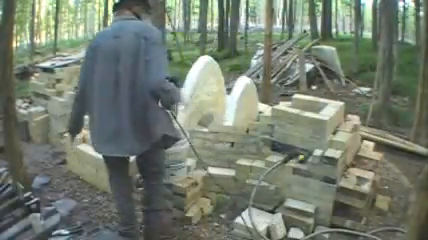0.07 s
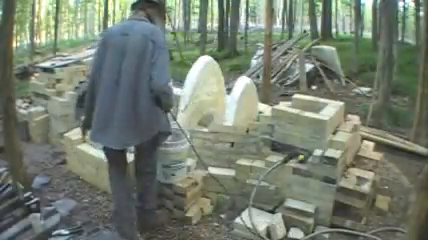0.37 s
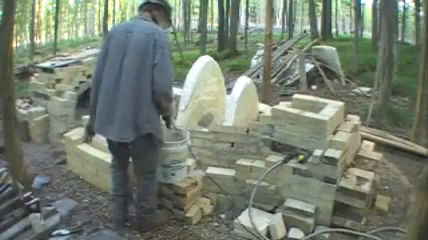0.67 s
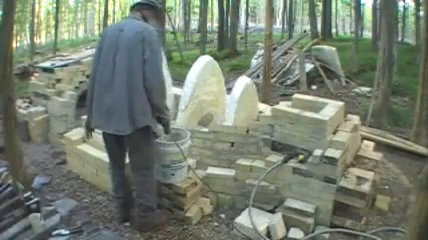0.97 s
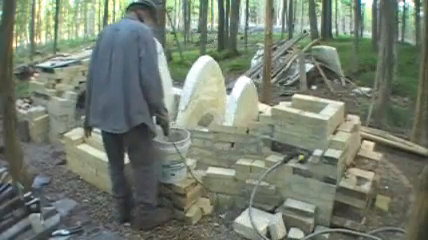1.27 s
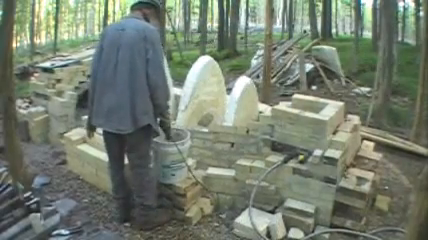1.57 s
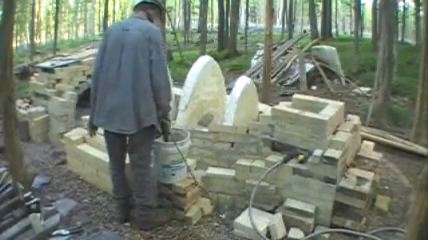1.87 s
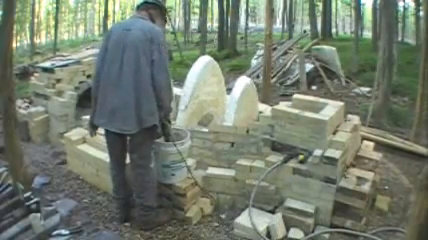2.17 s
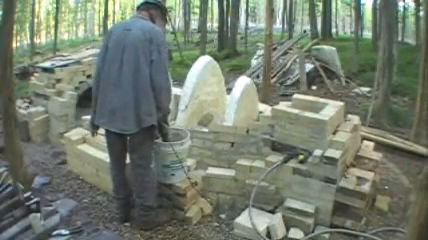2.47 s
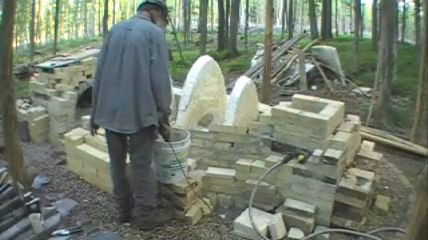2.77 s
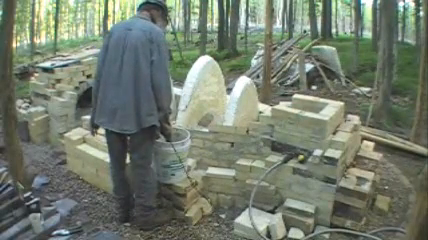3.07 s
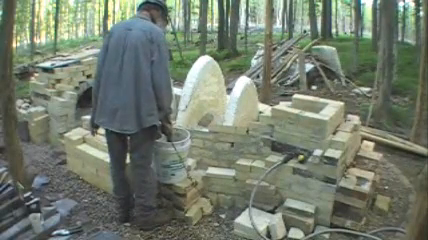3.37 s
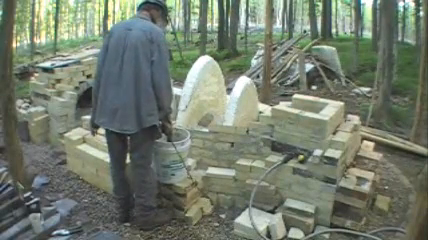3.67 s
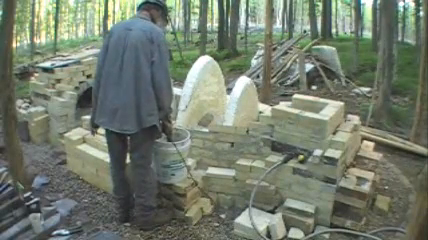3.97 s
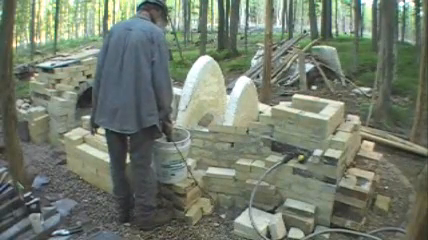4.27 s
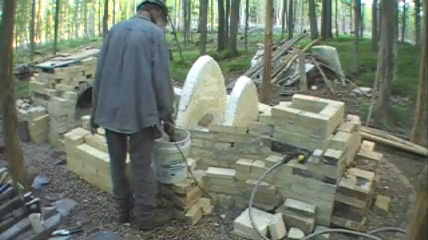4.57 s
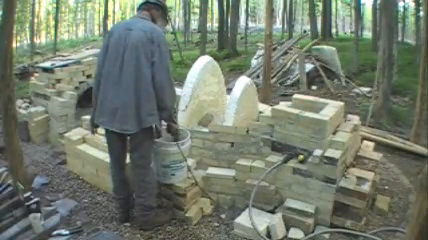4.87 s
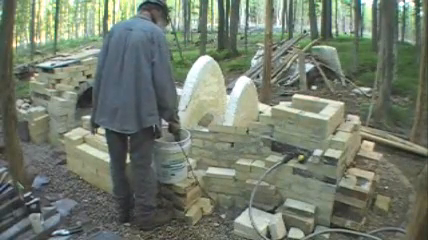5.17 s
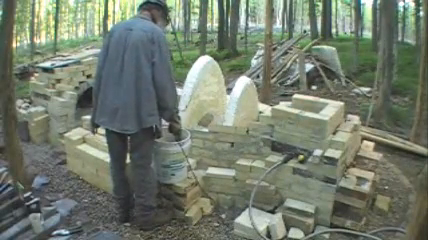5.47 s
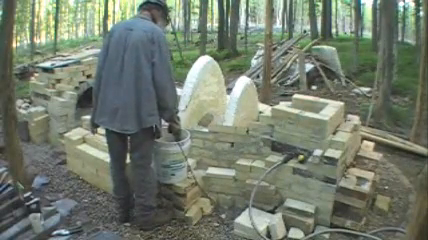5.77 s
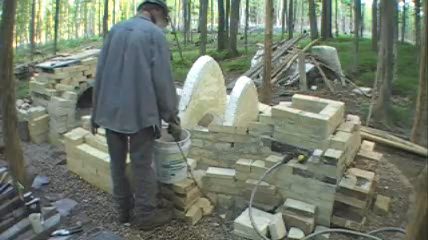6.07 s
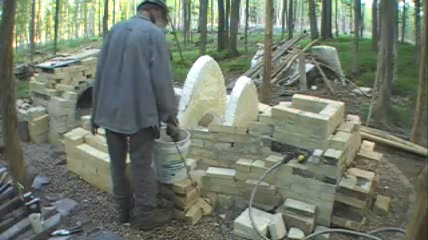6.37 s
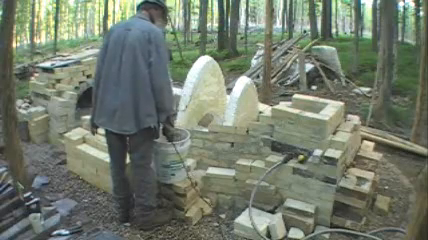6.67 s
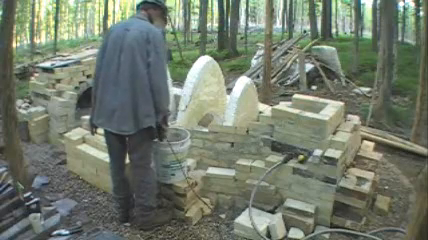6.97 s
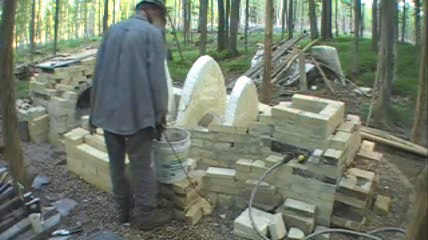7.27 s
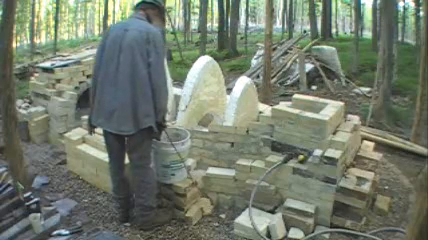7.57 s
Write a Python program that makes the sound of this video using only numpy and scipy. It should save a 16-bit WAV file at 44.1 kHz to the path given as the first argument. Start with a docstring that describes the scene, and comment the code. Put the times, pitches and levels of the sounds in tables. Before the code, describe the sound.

Over a faint woodland hush, two steps scuff on gravel at about 0.3 and 0.9 seconds. From 0.8 to 1.4 seconds a mixing paddle settles into wet mortar with soft, dull plops. At 1.5 seconds a corded electric drill starts with a short, grating squeal and rises to full speed within about half a second. It is much louder than the steps and runs without stopping to the end: a high gear whine with a fast throb, wavering slightly over hissing motor air and chattering gear teeth. The paddle knocks once against the plastic bucket at 2.3 seconds, then in short, hollow clusters around 5 to 5.5 and 6.3 seconds, and more often from 7 seconds until the end at about 7.7. Everything sits straight ahead of the microphone, outdoors, with only very faint echoes.

```python
"""In the hush of a quiet wood, two steps scuff on gravel and a paddle settles in a bucket of wet mortar.
At 1.5 s a corded drill starts with a squeal of strained gears, spins up and stirs the mortar.
Its rotor (the motor's spinning part) drives a fan and two gears: the gear whine throbs once per
paddle turn, over the rush of air and sparking brushes and the chatter of loose teeth.
Now and then, and more often near the end, the paddle knocks against the plastic bucket."""
import sys
import numpy as np
from scipy import signal
from scipy.fft import rfft, irfft, next_fast_len
from scipy.io import wavfile

SR = 44100
rng = np.random.default_rng(int(sys.argv[2]) if len(sys.argv) > 2 else 0)


def to_wav(sig):
    """Store sig (one row per channel, or 1-D mono) as 16-bit WAV at the path in sys.argv[1].

    Samples outside -1..1 are clipped; the rate is SR.
    """
    pcm = np.clip(np.atleast_2d(sig), -1, 1) * 32767
    pcm = np.round(pcm).astype(np.int16)
    wavfile.write(sys.argv[1], SR, pcm.T)  # frames by channels


N = 340452
TIME = np.arange(N) / SR

# tone colour of the outdoor hush: (frequency [Hz], level [dB])
HUSH_COLOUR = [(25, -32), (55, -26), (100, -12), (170, -7.5), (400, -0.5), (750, -1), (1050, 0.5),
               (1600, -1.5), (2150, -2), (2700, -1.5), (4000, -2.5), (7700, -4.5), (10000, -18),
               (13000, -24), (15000, -31)]
# boots pressing into gravel: (time [s], level [dB], fade time [s])
BOOT_SCUFFS = [(.276, -36.5, 0.02), (.290, -34.5, 0.059), (.328, -36, 0.018), (.365, -56, 0.17),
               (.52, -47, .025), (.672, -47, .018), (.907, -36, 0.014), (.913, -30.5, 0.013),
               (.929, -40, 0.016), (.96, -44.5, 0.031)]
# single bits of grit snapping: (time [s], level [dB])
GRIT_TICKS = [(.278, -37), (.290, -31), (.297, -24.5), (.314, -28), (0.394, -34), (.408, -33.5),
              (.671, -38), (0.776, -36.5), (0.915, -26), (1.025, -41), (1.38, -41)]
# tone colour of the gravel: (frequency [Hz], level [dB])
GRAVEL_COLOUR = [(50, -38), (150, -13), (400, -1.5), (1100, -6), (2000, -8), (3800, -5.5), (5000, -6),
                 (7400, 5.5), (8600, -4), (10000, -13), (15000, -23)]
# stones clinking together: (frequency [Hz], width [Hz], boost [dB])
STONE_RESONANCES = [(233, 110, 7.5), (4970, 390, 6)]
# the paddle settling in the mortar: (time [s], level [dB], fade time [s])
MORTAR_PLOPS = [(.806, -52, .008), (.93, -41.5, 0.03), (1.008, -45, 0.0034), (1.068, -46, 0.0051),
                (1.139, -44, 0.0045), (1.179, -44.5, .003), (1.215, -51, .018), (1.295, -46, 0.0037),
                (1.35, -43, 0.0068), (1.387, -46, 0.005)]
# tone colour of wet mortar: (frequency [Hz], level [dB])
MORTAR_COLOUR = [(80, -27), (250, -5), (450, -1), (1000, -0.5), (1500, -10), (3000, -17), (8000, -16),
                 (14000, -47)]
# two surges of starting current: (time [s], length [s], share of full current [0-1])
CURRENT_SURGES = [(1.512, 0.055, 0.77), (1.586, 0.094, 0.97)]
# drag from the gears at first, then from the mortar: (time [s], rotor speed lost [turns/s])
ROTOR_DRAG = [(1.655, 0), (1.695, 13), (1.8, 1), (1.98, 0), (2.17, 2.5), (2.4, -2.16), (2.6, -1.21),
              (3.0, 1.9), (4.2, 4.5), (4.44, 3), (4.62, 1.25), (4.94, 0.35), (5.16, 3), (5.68, 4),
              (6.15, 1.3), (6.62, 3), (6.95, 1.8), (7.13, 0), (7.35, 0.6), (7.72, 2.2)]
# tones of the meeting teeth; a tone's "order" is its number of cycles per rotor turn: (order, level [dB],
# phase swing [rad], throb depth [factor], share of the bite [factor], share of the squeal [factor])
GEAR_TONES = [(4, -32, 1.48, 0.39, 0, 0.59), (8, -32.5, 1.4, 0.79, 0.92, 0.87),
              (12, -31.5, 1.2, 0.25, 0.037, 1.12), (16, -36, 0.86, 0.28, 0.27, 0.34),
              (20, -44, 0.99, 0.27, 0, 1.1), (24, -41, .3, 0.24, 0, 1.9), (28, -51.5, 2, 0.35, 0.24, 0.46),
              (32, -55.5, 0.63, 0.37, 0, 1.9)]
# the lowest gear tone swells as the drill is moved, and the throb changes shape:
# (time [s], level change [dB], lead of the teeth's shift over their pressure [rad])
GEAR_WHINE = [(1.68, 4, 0), (1.74, -3, 0), (1.79, 6.5, -0.024), (2.1, 8.5, 0.54), (2.45, 4.5, 1.4),
              (3.1, 1.5, 1.6), (3.9, 3.5, 1.2), (4.55, 8, 0.14), (4.97, -2, -0.24), (5.1, 5, -0.6),
              (5.9, 1.5, 0.23), (6.35, 7.5, 0), (6.55, 5, -0.54), (6.75, 10, 0), (6.93, 4.5, -0.29),
              (7.04, 8.5, 0.18), (7.19, -3, .8), (7.35, 5, 1.2), (7.65, 9, 0.33)]
# how hard the teeth bite, lifting some higher gear tones: (time [s], boost [dB])
TOOTH_BITE = [(2.08, 0), (2.33, 7), (2.62, 3.5), (3.15, 1), (3.45, 7), (3.8, 3), (4.1, 5.5), (4.7, 3.5),
              (5.5, 0), (6.1, 3.5), (6.35, 5.5), (6.9, 2), (7.65, 6.5)]
# a gear tone swells or sinks as the drill is turned: (time [s], half length [s], order, change [dB])
GEAR_SWELLS = [(6.38, .14, 8, 2.5), (1.77, .06, 12, 4), (1.98, .1, 12, 5.5), (1.85, .1, 20, 5),
               (1.8, .08, 16, 5), (2.32, 0.11, 12, 7), (3.55, 0.4, 12, 6.5), (4.42, .2, 12, -4),
               (5.55, .4, 12, 4.5), (6.82, .2, 12, 3), (7.28, 0.08, 12, 7.5), (1.95, .14, 16, 5),
               (5.55, .4, 16, 3), (7.2, .7, 16, -4), (1.58, .02, 24, 14), (1.82, .07, 24, 5),
               (2.08, 0.2, 24, 6), (4.3, 0.18, 24, 8), (2.05, .2, 32, 10), (2.6, .25, 32, 5),
               (3.87, .13, 32, 8), (5.92, .22, 32, 9), (6.6, .25, 32, 5)]
# gearbox ringing under the strain of starting: (frequency [Hz], width [Hz], boost [dB])
SQUEAL_RESONANCES = [(868, 62, 25), (1710, 90, 19.5), (2920, 1200, 22.5)]
# tone colour of grating teeth: (frequency [Hz], level [dB])
GRATING_COLOUR = [(300, -25), (800, -2), (2000, -13), (3000, 2), (4500, -6), (9000, -26)]
# tone colour of the fan air and brushes: (frequency [Hz], level [dB])
AIR_COLOUR = [(25, -39), (100, -33), (190, -27.5), (270, -19), (400, -9), (690, -6.5), (1000, -3),
              (2250, -3), (3500, -0.5), (5500, 0.5), (7700, 0.5), (8900, -9.5), (10500, -14.5),
              (12400, -29), (15000, -39)]
# treble of that rush: (time [s], level change [dB])
AIR_TREBLE = [(2.3, 0.35), (5.9, -0.5), (6.9, -1.5), (7.72, -3)]
# the drill's housing and vents: (frequency [Hz], width [Hz], boost [dB])
HOUSING_RESONANCES = [(319, 45, 9), (810, 99, 8), (1090, 52, 4.5), (1560, 390, 3.5), (1910, 280, 5),
                      (2200, 110, -6), (2440, 270, 0), (3010, 1200, 5), (4280, 63, 3.5), (4640, 890, 5.5)]
# tones of the fan and the rotor's sliding contacts: (order, level [dB])
FAN_TONES = [(2, -52), (3, -49), (7, -47), (14, -41), (15, -44), (18, -43.5), (19, -43.5), (21, -44),
             (22, -44.5), (23, -47), (25, -64), (29, -61)]
# two tones that surge as the drill is turned: (time [s], order 11 level [dB], order 13 level [dB])
SURGING_TONES = [(1.75, -31, -43), (2.0, -27.5, -41), (2.25, -28, -24), (2.6, -31, -42),
                 (3.2, -31.5, -28.5), (3.5, -35, -30), (3.95, -31.5, -35), (4.35, -28.5, -28),
                 (4.62, -32.5, -39), (4.85, -28.5, -21.5), (5.15, -27, -38), (5.45, -31, -47),
                 (5.9, -25, -33), (6.22, -34.5, -33), (6.6, -24.5, -30), (6.85, -35.5, -35),
                 (7.1, -35, -23.5), (7.25, -26.5, -33), (7.45, -45, -30)]
# hum of the unbalanced rotor: (time [s], level [dB])
UNBALANCE_HUM = [(1.65, -58), (1.85, -47.5), (2.12, -41), (2.5, -44), (3.2, -42.5), (3.6, -44.5),
                 (4.1, -53), (4.8, -42.5), (7.72, -43.5)]
# loose gear teeth chattering: (time [s], level [dB])
CHATTER_LEVEL = [(1.95, -31), (2.3, -28.5), (2.7, -33.5), (3.7, -33), (4.05, -28), (4.4, -32), (4.6, -29),
                 (5.0, -33.5), (5.7, -32), (6.5, -32.5), (7.72, -39)]
# tone colour of the chatter: (frequency [Hz], level [dB])
CHATTER_COLOUR = [(200, -29.5), (600, -37), (850, 1.5), (1300, -9.5), (1900, -2), (2250, -11), (6000, -36)]
# the gearbox shell: (frequency [Hz], width [Hz], boost [dB])
SHELL_RESONANCES = [(860, 350, 6.5), (1838, 120, 17), (3045, 110, 30), (4500, 600, 16)]
# the paddle hitting the bucket: (time [s], level [dB], contact length [s], extra low thud [dB])
PADDLE_KNOCKS = [(2.305, -27, 0.015, 2), (5.042, -20, 0.007, 1), (5.127, -20.5, 0.01, -1),
                 (5.187, -22.5, 0.01, -1), (5.240, -19, .007, 0), (5.469, -20, 0.01, -1),
                 (6.238, -21, 0.0075, -3), (6.290, -23, .014, 2), (6.346, -21.5, 0.012, 3),
                 (6.708, -26, .007, -6), (7.120, -24.5, .007, -4), (7.140, -21.5, 0.012, -3),
                 (7.192, -25.5, .01, -2), (7.208, -24, 0.012, -1), (7.310, -22, 0.013, 4),
                 (7.384, -24, 0.014, 0), (7.450, -26, .008, 0), (7.505, -17.5, 0.004, -7),
                 (7.568, -13, 0.0055, -8)]
# ringing notes of the bucket wall: (frequency [Hz], time to fade by 60 dB [s], level [dB])
BUCKET_NOTES = [(376, 0.047, -3), (550, 0.021, 0.5), (785, 0.029, 7), (918, 0.042, 3.5), (1093, 0.03, 3),
                (1260, 0.011, 8), (1800, 0.013, 8)]
# stereo width: (frequency [Hz], level of the left-right difference [dB])
STEREO_WIDTH = [(60, -31), (150, -3), (300, -20), (900, -29), (1480, -11.5), (1900, -53), (3300, -25),
                (4300, -17.5), (7600, -20), (9200, 4), (10600, -15)]

SMALL_GEAR_TEETH, BIG_GEAR_TEETH = 4, 41
GEAR_RATIO = SMALL_GEAR_TEETH / BIG_GEAR_TEETH   # paddle turns per rotor turn
TRIGGER_S, FREE_TURNS_PER_S, MAINS_HZ = 1.5, 366.5, 60


def from_db(db):
    """Turn decibels into a factor to multiply by."""
    return 10 ** (np.asarray(db) / 20)


def rms_one(x):
    """Scale a signal to an average power of 1."""
    return x / np.sqrt(np.mean(x ** 2) + 1e-20)


def in_time(rows):
    """Join a table's points with straight lines: one curve for each column after the time."""
    times, *columns = np.transpose(rows)
    return [np.interp(TIME, times, column) for column in columns]


def drift(rate_hz):
    """A smooth random wobble of typical size 1; a higher rate wobbles faster."""
    pole = np.exp(-40 * np.pi * rate_hz / SR)
    noise = rng.standard_normal(N // 20 + 4002)   # one value per 20 samples
    slow = signal.lfilter([1], [1, -2 * pole, pole * pole], noise)[4000:]
    return np.interp(np.arange(N) / 20, np.arange(len(slow)), rms_one(slow))


def boost_db(hz, resonances):
    """The boost at a frequency: each resonance adds a bell-shaped bump."""
    return sum(db / (1 + (2 * (hz - centre) / width) ** 2) for centre, width, db in resonances)


def colour(x, spectrum, resonances=(), keep_power=True):
    """Filter a sound by a smooth tone colour with resonances on top."""
    size = next_fast_len(N + SR // 10)
    hz = np.maximum(np.fft.rfftfreq(size, 1 / SR), 1)
    points_hz, points_db = np.transpose(spectrum)
    smooth_db = np.interp(np.log(hz), np.log(points_hz), points_db)
    gain = from_db(smooth_db + boost_db(hz, resonances))
    return irfft(rfft(x, size) * (rms_one(gain) if keep_power else gain), size)[:N]


def ring(x, hz, fade_s):
    """One ringing note, set off by x, that fades by 60 dB in fade_s."""
    decay, angle = from_db(-60 / (fade_s * SR)), 2 * np.pi * hz / SR
    return signal.lfilter([0, np.sin(angle)], [1, -2 * decay * np.cos(angle), decay * decay], x + 1e-18)


def bursts(rows, attack_s=0):
    """The loudness curve of contacts that build up and die away."""
    power = np.zeros(N)
    for time_s, db, fade_s in rows:
        start = int(time_s * SR)
        age = TIME[:min(SR // 2, N - start)]
        rise = np.minimum((age + 1 / SR) / (attack_s + 1 / SR), 1)
        fall = np.exp(-np.maximum(age - attack_s, 0) / fade_s)
        power[start:start + len(age)] += (from_db(db) * rise * fall) ** 2
    return np.sqrt(power)


def hush(level_db=-54.5, stir_db=1.5):
    """Leaves and clothes rustle softly."""
    return colour(rng.standard_normal(N) * from_db(level_db + stir_db * drift(27)), HUSH_COLOUR)


def gravel_steps(grain_db=0.5, tick_s=0.0016):
    """Stones grind under a boot in clumps of tiny clicks; a few tick on their own."""
    grains = rms_one(rng.standard_normal(N) * from_db(grain_db * np.clip(drift(900), -2, 2)))
    ticks = rng.standard_normal(N) * bursts([(time_s, db, tick_s) for time_s, db in GRIT_TICKS])
    return colour(grains * bursts(BOOT_SCUFFS) + ticks, GRAVEL_COLOUR, STONE_RESONANCES)


def mortar_plops():
    """Wet mortar gives way in short, dull smacks."""
    return colour(bursts(MORTAR_PLOPS, attack_s=0.002) * rng.standard_normal(N), MORTAR_COLOUR)


def run_up(rise_s=0.0987, creep_s=0.242, creep_share=0.273):
    """The rotor's share of full speed: a quick rise after the trigger, then a slow creep."""
    age = np.maximum(TIME - TRIGGER_S, 0)
    return 1 - (1 - creep_share) * np.exp(-age / rise_s) - creep_share * np.exp(-age / creep_s)


def motor_current(attack_s=0.013, release_s=0.02, tail_share=0.11, tail_s=0.67):
    """Starting current, 0-1: each surge rises, holds and falls; the last leaves a slow tail."""
    surges = 0
    for start_s, length_s, share in CURRENT_SURGES:
        rise = (TIME - start_s) / attack_s
        since_end = TIME - start_s - length_s
        surges += share * np.clip(np.minimum(rise, 1 - since_end / release_s), 0, 1)
    tail = tail_share * (since_end > 0) * np.exp(-np.abs(since_end) / tail_s)
    return np.clip(np.maximum(surges, tail), 0, 1)


def swell(order):
    """Decibels that one gear tone gains or loses as the drill is turned."""
    return sum(db * np.exp(-((TIME - time_s) / half_s) ** 2)
               for time_s, half_s, which, db in GEAR_SWELLS if which == order)


def gear_whine(speed, rotor, current, flutter_db=0.5, waver_db=0.7, lowest_hz=1000):
    """Meeting teeth whine; the off-centre gear presses harder and shifts them once per paddle turn."""
    paddle = rotor * GEAR_RATIO
    unevenness = 0.16 * drift(140)
    whine_db, lead = in_time(GEAR_WHINE)
    bite_db, = in_time(TOOTH_BITE)
    out = 0
    for order, db, swing, throb, bite, squeal in GEAR_TONES:
        hz, swell_db = order * speed, swell(order)
        if order == SMALL_GEAR_TEETH:   # the lowest tone: one cycle per tooth
            db += whine_db
        else:
            db += swell_db + bite * bite_db + waver_db * drift(0.97)
        db += flutter_db * drift(7.5)
        # at start-up the rising tones sweep through the gearbox resonances and squeal
        db += squeal * current * boost_db(hz, SQUEAL_RESONANCES)
        pressure = rms_one(np.exp(throb * np.cos(paddle) + unevenness))
        contact = current + (1 - current) * pressure   # under strain the teeth never lose touch
        radiated = 1 / np.sqrt(1 + (lowest_hz / hz) ** 10)   # a small housing gives off little bass
        swing *= (1 - current) * from_db(-np.maximum(swell_db, 0))   # a swelling tone holds steadier
        slip = 0.55 * current * drift(100)   # strained teeth slip unevenly
        shift = swing * np.cos(paddle + lead + 0.19 * drift(9))
        jitter = 0.16 * np.sqrt(order / SMALL_GEAR_TEETH) * drift(62)
        phase = order * rotor + shift + slip + jitter + rng.uniform(0, 2 * np.pi)
        out += from_db(db) * radiated * contact * np.sin(phase)
    return np.sqrt(2) * out


def grating_teeth(current, mains, level_db=-26, ripple=0.43):
    """Under the strain of starting, the teeth grate and set the gearbox ringing."""
    grating = rng.standard_normal(N) * current ** 2 * (1 + ripple * mains)
    return from_db(level_db) * colour(grating, GRATING_COLOUR, SQUEAL_RESONANCES)


def air_rush(rotor, pace, full_speed_db=-19.5, spark_db=1.0, treble_hz=4000):
    """Fan air and sparking brushes (the motor's contacts) hiss through the housing."""
    level_db = full_speed_db - 12.5 * (1 - pace) ** 0.66   # quieter at low speed
    treble_db = in_time(AIR_TREBLE)[0] - 20 * (1 - pace) ** 4.2   # and duller
    rotor_pulse = 1 + 0.042 * (np.cos(rotor) + np.cos(2 * rotor + 1) + 0.81 * np.sin(3 * rotor))
    paddle_pulse = 1 + 0.0058 * np.cos(rotor * GEAR_RATIO)
    hiss = rms_one(rng.standard_normal(N) * rotor_pulse * paddle_pulse * from_db(spark_db * drift(200)))
    treble = signal.sosfilt(signal.butter(1, treble_hz, "high", fs=SR, output="sos"), hiss)
    hiss += (from_db(treble_db) - 1) * treble
    return colour(hiss * from_db(level_db), AIR_COLOUR, HOUSING_RESONANCES)


def rotor_tones(rotor, waver_db=3.5, flutter_db=1.35, jitter_rad=0.087):
    """The unbalanced rotor hums; above it, tones tied to its speed each waver on their own."""
    tones = list(zip((11, 13), in_time(SURGING_TONES)))
    tones += [(order, db + waver_db * drift(2.3)) for order, db in FAN_TONES]
    chatter_db, = in_time(CHATTER_LEVEL)
    # two tones follow the chatter's level and beat together once per paddle turn
    for order, db in ((5, -10), (5 + GEAR_RATIO, -8)):
        tones.append((order, chatter_db + db + waver_db * drift(1.2)))
    out = from_db(in_time(UNBALANCE_HUM)[0]) * np.sin(rotor)
    for order, db in tones:
        phase = order * rotor + jitter_rad * drift(25) + rng.uniform(0, 2 * np.pi)
        out += from_db(db + flutter_db * drift(5.6)) * np.sin(phase)
    return np.sqrt(2) * out


def gear_chatter(rotor, bunching=0.25, uneven_db=0.5):
    """Loose teeth chatter against the gearbox shell, bunched once per paddle turn."""
    bunches = np.exp(bunching * np.sin(rotor * GEAR_RATIO))
    chatter = rms_one(rng.standard_normal(N) * bunches * from_db(uneven_db * drift(45)))
    return colour(chatter * from_db(in_time(CHATTER_LEVEL)[0]), CHATTER_COLOUR, SHELL_RESONANCES)


def drill(idle_ripple=0.013, load_ripple=0.67, onset_s=0.016):
    """The whole drill: its motor's pull pulses at twice the mains rate, most deeply at high current."""
    drag, = in_time(ROTOR_DRAG)
    pace, current = run_up(), motor_current()
    speed = np.maximum(pace * (FREE_TURNS_PER_S - drag), 1)   # [turns/s]
    rotor = 2 * np.pi * np.cumsum(speed) / SR   # angle turned so far [rad]
    mains = -np.sin(4 * np.pi * MAINS_HZ * TIME)
    pull = 1 + (idle_ripple + load_ripple * current) * mains
    # the higher the power of pace, the later a layer comes in
    whine = gear_whine(speed, rotor, current) * pace ** 1.55 * pull
    tones = rotor_tones(rotor) * pace ** 3
    air = air_rush(rotor, pace) * (1 + idle_ripple * mains)
    chatter = gear_chatter(rotor) * pace ** 6.9
    grating = grating_teeth(current, mains)
    switched_on = np.clip((TIME - TRIGGER_S) / onset_s, 0, 1) ** 2
    return switched_on * (from_db(-1.1) * whine + from_db(-1.5) * tones + air + chatter + grating)


def faint_low_tone(loudest_db=-74.5):
    """A very faint low tone fades in and wavers near 100 Hz."""
    waver, = in_time(ROTOR_DRAG)
    hz = 128 - 10 * waver
    level_db = loudest_db + 3 * np.minimum(waver - 3, 0)
    fade_in = run_up() ** 3
    return np.sqrt(2) * fade_in * from_db(level_db) * np.sin(2 * np.pi * np.cumsum(hz) / SR)


def bucket_knocks(lowest_hz=290, tap=0.65, scrape=0.63, attack_s=0.00402):
    """The paddle taps and briefly scrapes the bucket wall, whose notes die away fast."""
    def wall(push, notes):
        push = signal.sosfilt(signal.butter(4, lowest_hz, "high", fs=SR, output="sos"), push + 1e-18)
        return sum((-1) ** k * from_db(db) * ring(push, hz, fade_s)
                   for k, (hz, fade_s, db) in enumerate(notes))

    def force(rows):
        push = scrape * bursts(rows, attack_s) * rng.standard_normal(N)
        for time_s, db, length_s in rows:
            push[int((time_s + attack_s) * SR)] += tap * from_db(db) * np.sqrt(length_s * SR / 2)
        return push

    thud = force([(time_s, db + thud_db, length_s) for time_s, db, length_s, thud_db in PADDLE_KNOCKS])
    knock = force([row[:3] for row in PADDLE_KNOCKS])
    wall_gain = np.linalg.norm(wall(signal.unit_impulse(SR // 4), BUCKET_NOTES))
    return (wall(thud, BUCKET_NOTES[:2]) + wall(knock, BUCKET_NOTES[2:])) / wall_gain


def echoes(x, fade_s=0.32):
    """Many faint echoes come back from tree trunks and stacked bricks."""
    age = TIME[:SR // 2]
    tail = rng.standard_normal(len(age)) * from_db(-60 * age / fade_s)
    return signal.fftconvolve(x, tail / np.linalg.norm(tail))[:N]


def scene():
    """Every source is straight ahead; a left-right difference adds stereo width."""
    middle = drill() + faint_low_tone() + from_db(3.5) * bucket_knocks()
    middle += mortar_plops() + gravel_steps() + hush()
    side = colour(echoes(middle), STEREO_WIDTH, keep_power=False)
    return np.array([middle + side, middle - side]) * from_db([[-0.3], [0.3]])


def record(dry, stop_hz=15700):
    """Cut the highest treble steeply."""
    return signal.sosfilt(signal.cheby2(16, 70, stop_hz, fs=SR, output="sos"), dry)


dry = scene()
out = record(dry)
to_wav(out)
```